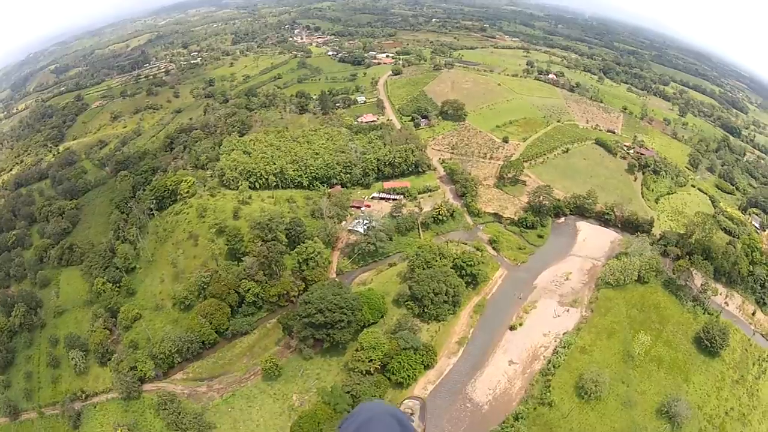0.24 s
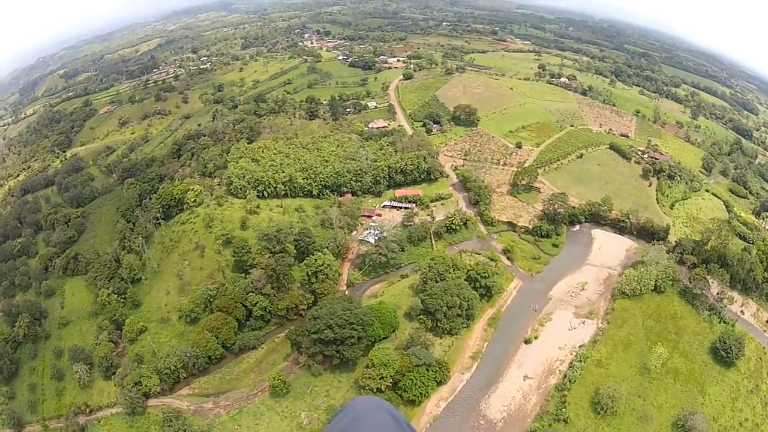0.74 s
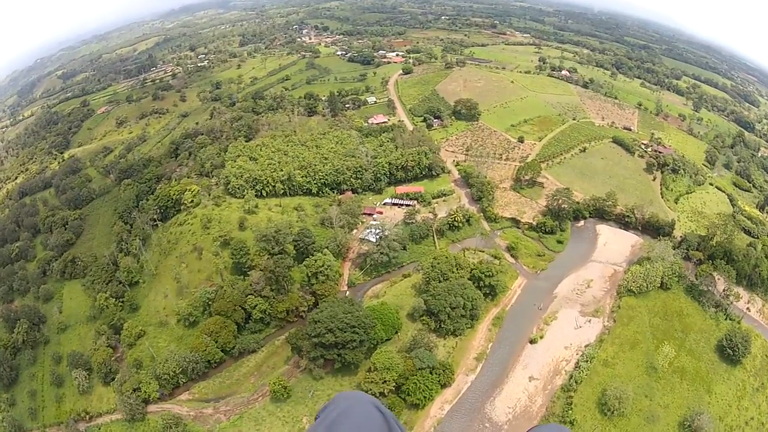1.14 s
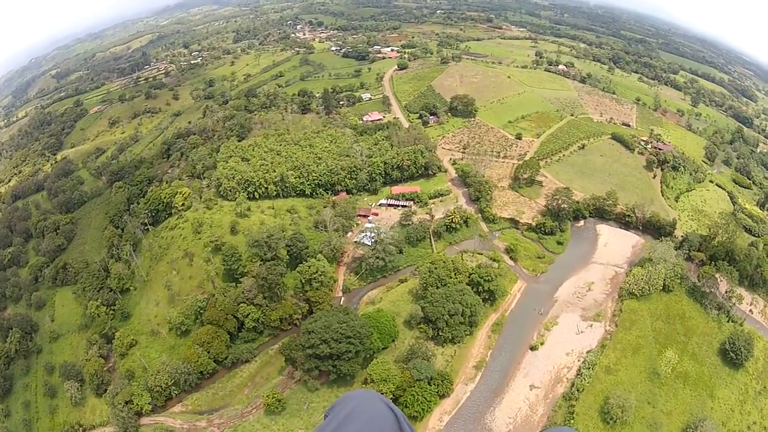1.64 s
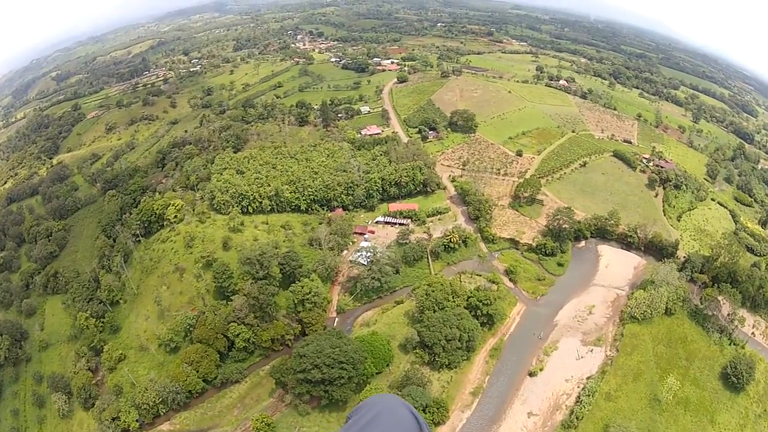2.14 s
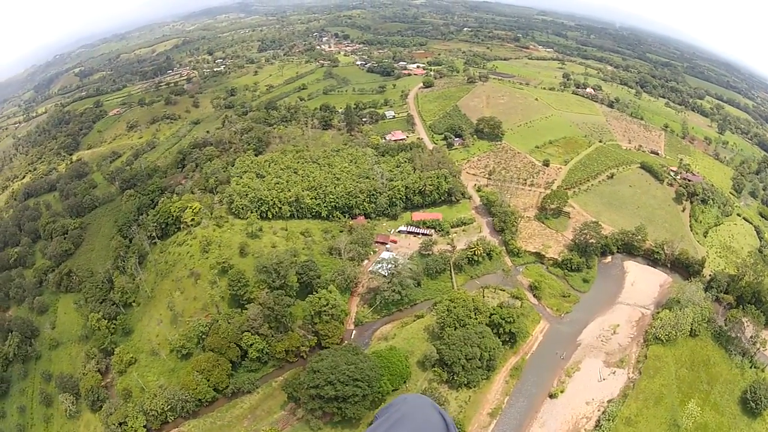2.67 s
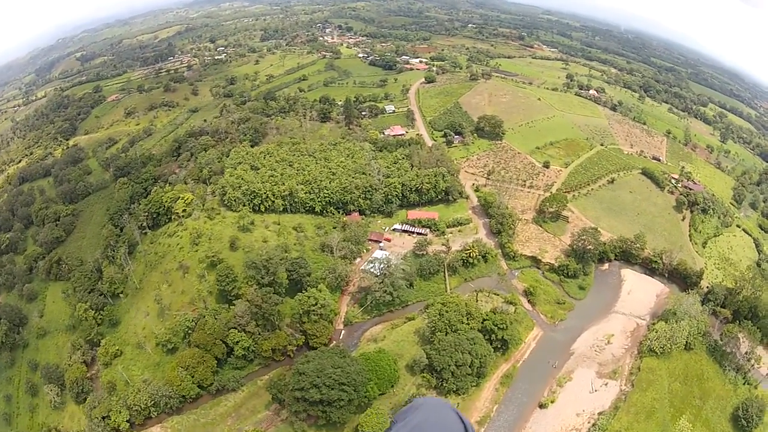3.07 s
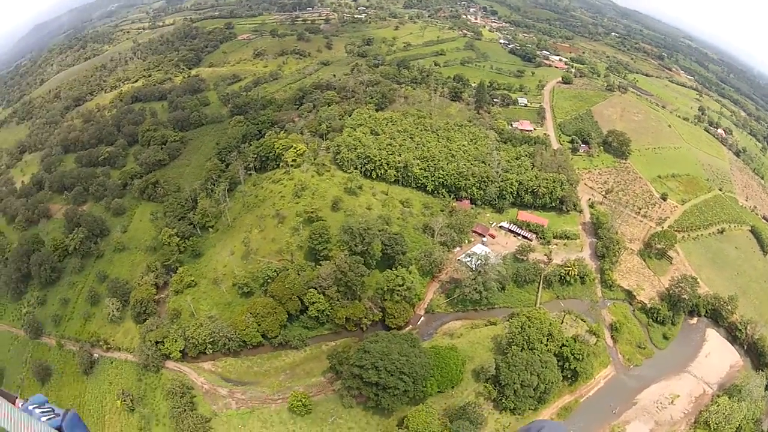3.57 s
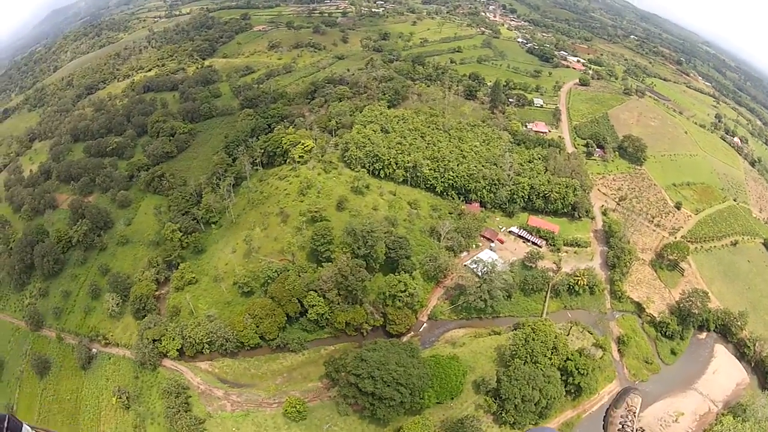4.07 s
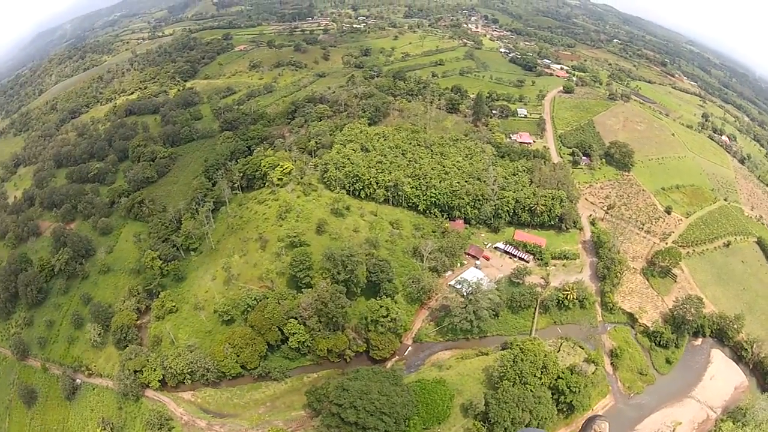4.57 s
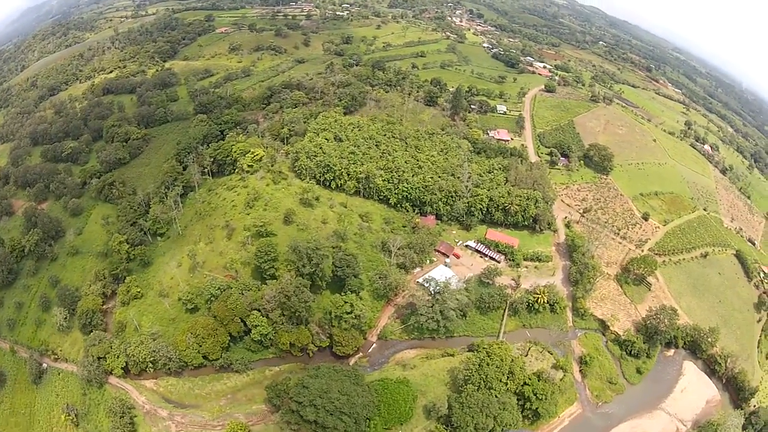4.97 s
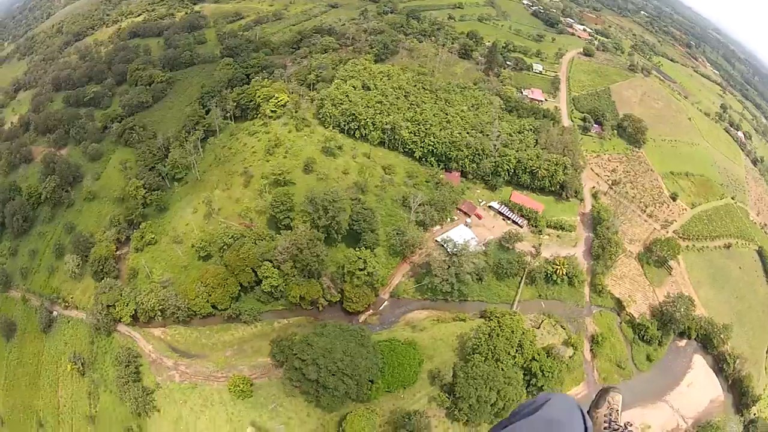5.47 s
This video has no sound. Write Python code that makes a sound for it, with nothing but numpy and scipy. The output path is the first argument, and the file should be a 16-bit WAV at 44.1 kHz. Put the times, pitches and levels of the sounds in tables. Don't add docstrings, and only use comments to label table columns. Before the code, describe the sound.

Outdoor paramotor flight, heard very close through a boxy, low-quality camera microphone. The propeller beats about sixty-five times a second over a buzzing exhaust, its pitch wavering only slightly. Hollow wind rush and low flutter ride along throughout. Sparse clipped pops at first become frequent gritty knocks after about three seconds, then thin a little near the end, while the motor keeps running.

```python
import sys
import numpy as np
from scipy import signal
from scipy.fft import rfft, irfft, next_fast_len
from scipy.io import wavfile
from scipy.ndimage import uniform_filter1d, minimum_filter1d, map_coordinates

SR = 44100
rng = np.random.default_rng(int(sys.argv[2]) if len(sys.argv) > 2 else 0)


def convert_level_to_amplitude(level_db):
    exponent = np.asarray(level_db, float) / 20
    return 10 ** exponent


def bounce(signal):
    frames = np.transpose(np.atleast_2d(signal))
    limited = np.clip(frames, -1, 1)
    pcm = np.round(limited * 32767).astype(np.int16)
    wavfile.write(sys.argv[1], SR, pcm)


N = 251811

# [t/s, blade pass f/Hz]
SPEED = [(0, 64.997), (.3, 65.177), (1.2, 65.287), (1.8, 65.57), (2.1, 66.152), (2.7, 65.049),
         (3.31, 64.58), (4.21, 65.033), (4.7, 65.717), (5.4, 65.572), (5.71, 65.588)]
# [f/Hz, density level/dB]
SWISH_SPECTRUM = [(500, -42), (900, -9.5), (1200, -2), (1650, -7.5), (1950, 1), (3000, 1.5), (3400, -5),
                  (4000, -3.5), (4500, -9), (5100, -8.5), (5500, -15), (5800, -17.5), (6100, -24),
                  (7000, -120)]
# [t/s, level/dB]
LOAD = [(0, -32.5), (.85, -33.5), (1.5, -33.5), (1.68, -33), (1.8, -34), (1.95, -31.5), (2.27, -34.3),
        (2.65, -31.5), (3.02, -33.5), (3.25, -32), (3.42, -35), (3.72, -34), (4.0, -35.5), (4.3, -34.5),
        (4.42, -33), (4.9, -34.8), (5.22, -33.5), (5.71, -35)]


def along(points, hz):
    f_hz, value = np.transpose(points)
    return np.interp(np.log(hz + 1), np.log(f_hz + 1), value)


def curves(rows):
    t_s, *columns = np.transpose(rows)
    return [np.interp(np.arange(N) / SR, t_s, column) for column in columns]


def wobble(rate_hz):
    coarse = np.arange(0, N + 16, 16)
    knots = rng.standard_normal(int(N * rate_hz / SR) + 4)
    return np.interp(np.arange(N), coarse, map_coordinates(knots, [coarse * rate_hz / SR]))


def noise(spectrum, gate):
    size = next_fast_len(N + 8192)
    gain = convert_level_to_amplitude(along(spectrum, np.fft.rfftfreq(size, 1 / SR)))
    x = irfft(rfft(gate * rng.standard_normal(N), size) * gain, size)[:N]
    return x / np.std(x)


def turned(away, toward, done=1):
    # [t/s, turn 0-1]
    head_turn = [
        (0, 0),
        (.6, .04),
        (1.0, .3),
        (1.8, .42),
        (2.7, 0.44),
        (3.4, 0.74),
        (3.9, 0.91),
        (4.8, 0.99),
        (5.71, 0.8),
    ]
    return away + (toward - away) * np.clip(curves(head_turn)[0] / done, 0, 1)


def propeller(passes):
    # [multiple of blade pass, level/dB rms]
    blade_orders = [(1, -30), (2, -23), (3, -28), (4, -27.5), (5, -19.5), (6, -22), (7, -26.5), (8, -27),
                    (9, -44), (10, -27.5), (11, -28), (12, -37), (13, -38), (14, -45), (15, -52),
                    (16, -44.5), (17, -46.5), (18, -54), (19, -48), (20, -54.5), (21, -55.5), (22, -56)]
    clear_at = .55
    low_db, fading_db = turned(-1, 3), turned(4.5, -3.5)
    fifth_db, rising_db = turned(-4, 1.5, clear_at), turned(-11, 1, clear_at)
    scatter_rad = turned(1.18, .3)
    detour_rad = turned(-3, 0)
    out = np.zeros(N)
    for k, db in blade_orders:
        if k < 5:
            lean_db = low_db
        elif k == 5:
            lean_db = fifth_db
        elif k in (6, 9, 11):
            lean_db = rising_db
        else:
            lean_db = fading_db if k < 12 else 0
        spread_rad = .15 if k in (2, 5) else scatter_rad
        phase_rad = spread_rad * wobble(0.84) + 0.047 * wobble(12)
        if k in (1, 3):
            phase_rad += detour_rad
        elif k == 8:
            phase_rad += np.pi
        level = convert_level_to_amplitude(db + lean_db + 0.49 * wobble(9)) * np.sqrt(2)
        out -= level * np.cos(2 * np.pi * k * passes + 0.36 + phase_rad)
    return out


def engine(passes):
    # [multiple of firing rate, level/dB rms]
    exhaust_orders = [(1, -27.0), (2, -40.0), (3, -31.0), (4, -32.0), (5, -27.0), (6, -42.0), (7, -43.0),
                      (8, -50.0), (10, -58.0)]
    firings = 1.9245 * passes
    tones = np.zeros(N)
    for k, db in exhaust_orders:
        level = convert_level_to_amplitude(db + 0.9 * wobble(5.08)) * np.sqrt(2)
        phase_rad = 2 * np.pi * (k * firings + rng.random()) + 0.26 * wobble(10)
        tones += level * np.cos(phase_rad)
    sideways_db = 5.5 * np.sin(turned(0, np.pi))
    chop = 1 + 0.22 * np.cos(2 * np.pi * passes)
    return convert_level_to_amplitude(-2.5 + sideways_db) * tones * chop


def swish(passes):
    # [place/passes, width/passes, level/dB]
    bursts = [
        (-.24, .045, 0),
        (-.14, .06, -1),
        (-.05, .07, 0),
        (.04, .05, -4),
        (.125, .035, 2),
        (.36, .07, -12),
    ]
    gate = np.full(N, convert_level_to_amplitude(-.5))
    for place, width, db in bursts:
        turn = passes - place + .5
        strength = convert_level_to_amplitude(1.7 * rng.standard_normal(int(turn[-1]) + 3))[turn.astype(int) + 1]
        gate += convert_level_to_amplitude(db) * strength * np.exp(-((turn % 1 - .5) / width) ** 2)
    level_db = curves(LOAD)[0] + 1.1 * wobble(12)
    return convert_level_to_amplitude(level_db) * noise(SWISH_SPECTRUM, gate * convert_level_to_amplitude(0.98 * wobble(300)))


def rattle(passes, below_db):
    orders = np.arange(23, 52)
    luck = rng.standard_normal((len(orders), 2))
    fade_db = .22 * (orders - orders[0])
    gains = convert_level_to_amplitude(along(SWISH_SPECTRUM, orders * SPEED[0][1]) - fade_db + 2 * luck[:, 0])
    lines = np.zeros(N)
    for k, gain, offset in zip(orders, gains, luck[:, 1]):
        level = gain * convert_level_to_amplitude(2 * wobble(2))
        lines += level * np.cos(2 * np.pi * k * (passes - .125) + 1.1 * offset + .5 * wobble(3))
    return convert_level_to_amplitude(curves(LOAD)[0] - below_db) * lines


def wind():
    # [t/s, airstream level/dB, flutter over buffeting/dB]
    gusts = [(0, -20, 1), (.47, -22, 3), (.62, -22, 3), (1.1, -23, 4), (1.3, -23, 1), (1.55, -22.5, 4.5),
             (2.2, -24, 0.5), (2.45, -18.5, -1.5), (2.57, -27, 1.5), (2.8, -20.5, 3), (3.04, -23.5, 3),
             (3.25, -19.5, 4.5), (3.8, -16.5, -0.5), (4.0, -23, 1.5), (4.75, -21, -3.5), (5.03, -17, 5),
             (5.42, -21, -4), (5.71, -25, 4.5)]
    # [f/Hz, density level/dB]
    buffet_spectrum = [(10, -42), (20, -3), (45, -3), (70, 3.5), (110, 1), (150, -8.5), (250, -30),
                       (800, -120)]
    flutter_spectrum = [(60, -42), (110, -4), (160, 1.5), (220, 0), (290, -12), (450, -39), (1200, -120)]
    rush_spectrum = [(100, -41), (200, -17), (280, -3), (400, -3), (550, -2.5), (650, -2), (750, -8.5),
                     (900, -15), (1050, -22.5), (1300, -37), (2000, -83), (3000, -120)]
    gust_db, over_db = curves(gusts)
    buffet = convert_level_to_amplitude(gust_db + 1.8 * wobble(12)) * noise(buffet_spectrum, 1)
    flutter_db = gust_db + over_db + 1.4 * wobble(9)
    flutter = convert_level_to_amplitude(flutter_db) * noise(flutter_spectrum, convert_level_to_amplitude(1.1 * wobble(17)))
    rush_db = -16 + 0.18 * (gust_db - gust_db.mean()) + 0.33 * wobble(7)
    rush = convert_level_to_amplitude(rush_db) * noise(rush_spectrum, convert_level_to_amplitude(0.51 * wobble(24.97)))
    return buffet + flutter + rush


def yielding(x, top=1.0):
    need = np.minimum(1, top / (np.abs(x) + 1e-9))
    held = minimum_filter1d(need, size=120)
    return x * uniform_filter1d(uniform_filter1d(held, size=60), size=60)


def slammed(x):
    # [t/s, time past full scale/ms]
    slams = [(0.1427, 0.41), (0.9004, 0.34), (1.5285, 0.39), (2.1007, 0.39), (2.8182, 0.32), (2.9107, 0.68),
             (3.1728, 0.54), (3.4361, 0.54), (3.7603, 0.43), (3.8218, 0.48), (3.868, 0.66), (3.945, 0.73),
             (3.9607, 0.45), (4.0993, 0.68), (4.1761, 0.5), (4.1916, 0.41), (4.2374, 0.41), (4.2684, 0.66),
             (4.3298, 0.57), (4.4065, 0.48), (4.5132, 0.62), (4.5898, 0.57), (4.6659, 0.41), (4.8182, 0.41),
             (4.922, 0.43), (5.0404, 0.5), (5.138, 0.66), (5.1533, 0.63), (5.565, 0.41), (5.5807, 0.48)]
    share, pull = np.ones(N + SR), np.zeros(N + SR)
    ms = np.arange(-300, 300) / SR * 1000
    width_ms = .35
    for t_s, flat_ms in slams:
        centre = round(t_s * SR)
        at = slice(centre - 300, centre + 300)
        share[at] -= np.exp(-.5 * (ms / 0.48) ** 2)
        pull[at] -= 0.91 * np.exp(.5 * ((flat_ms / 2) ** 2 - ms ** 2) / width_ms ** 2)
    return share[:N] * x + pull[:N]


def scene():
    first_pass = .726
    passes = first_pass + np.cumsum(curves(SPEED)[0]) / SR
    membrane = yielding(propeller(passes) + engine(passes) + wind())
    return slammed(membrane + swish(passes) + rattle(passes, below_db=16.0))[None]


def top_cut(x):
    return signal.sosfilt(signal.butter(12, 16550, fs=SR, output="sos"), x)


def record(dry):
    hold_hz, top_hz = 12000, 15300
    hz = np.fft.rfftfreq(N, 1 / SR)
    lean = irfft(rfft(dry) / (1 + (22 / (hz + .1)) ** 4), N)
    coarse = np.clip(signal.resample_poly(lean, hold_hz, SR, axis=1), -1, 1)
    steps = np.repeat(coarse, 4, axis=1)
    held = signal.resample_poly(steps, SR, 4 * hold_hz, axis=1)[:, :N]
    limited = irfft(rfft(held) * (hz < top_hz), N)
    return top_cut(limited)


dry = scene()
out = record(dry)
bounce(out)
```